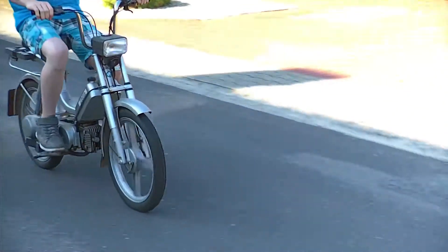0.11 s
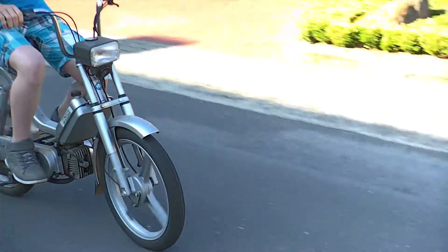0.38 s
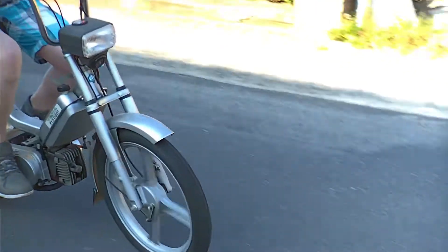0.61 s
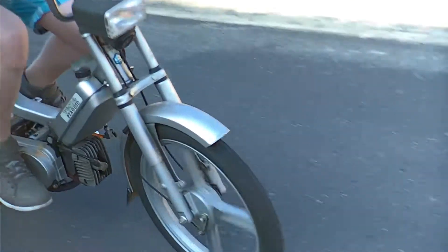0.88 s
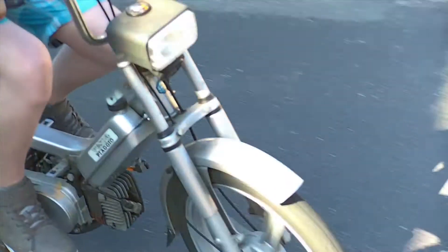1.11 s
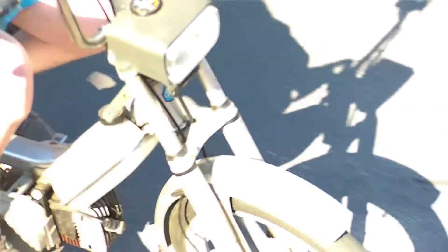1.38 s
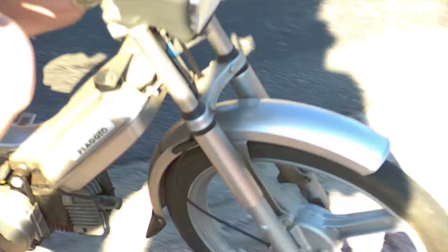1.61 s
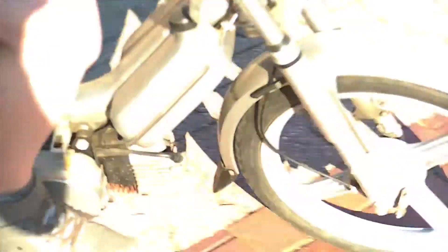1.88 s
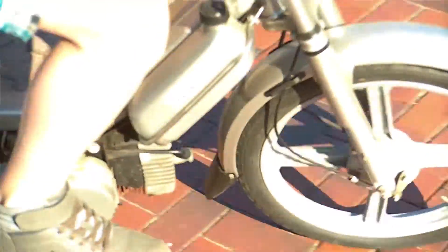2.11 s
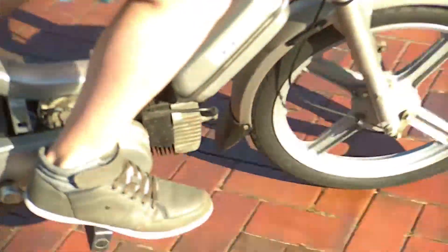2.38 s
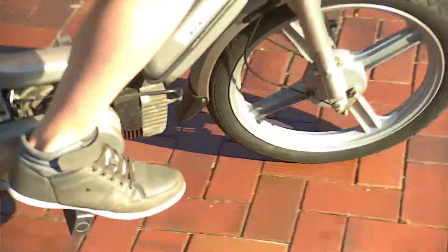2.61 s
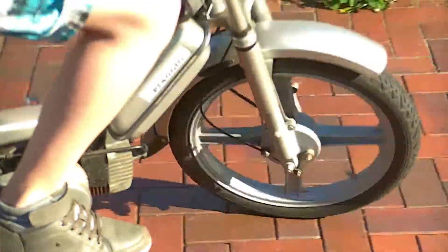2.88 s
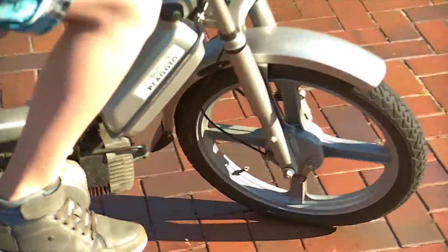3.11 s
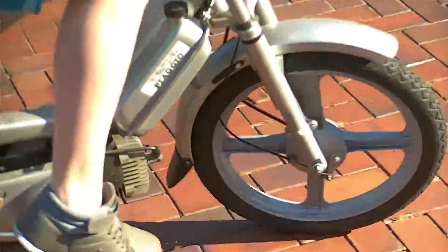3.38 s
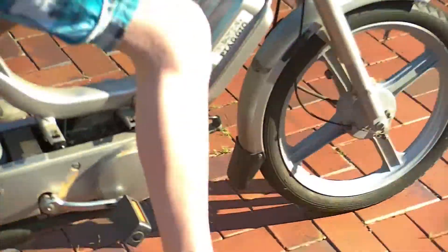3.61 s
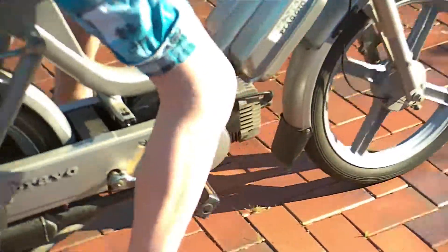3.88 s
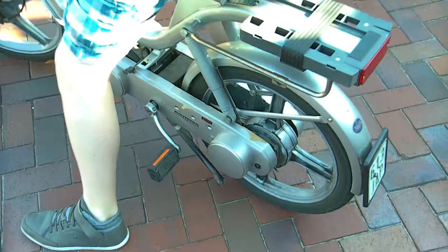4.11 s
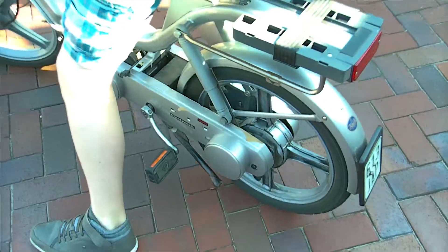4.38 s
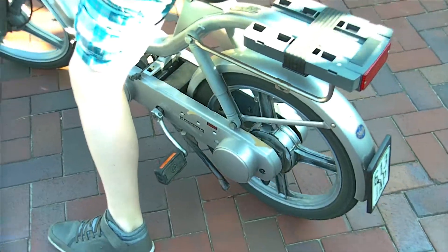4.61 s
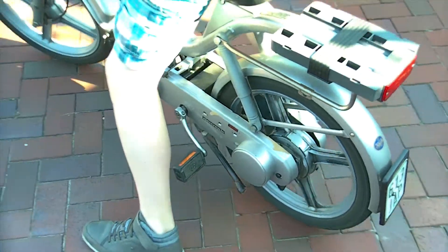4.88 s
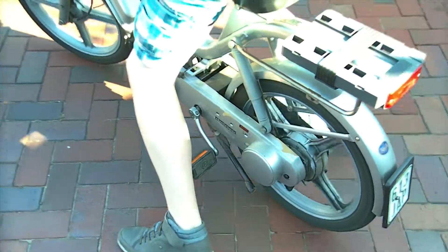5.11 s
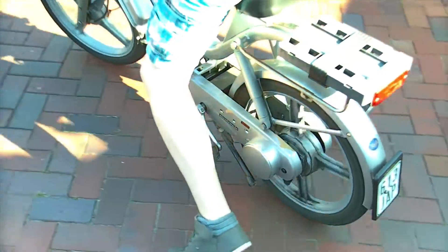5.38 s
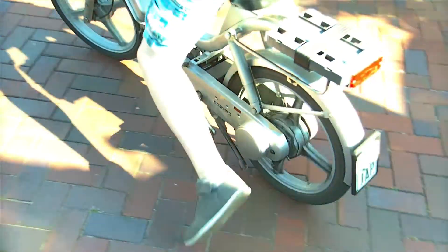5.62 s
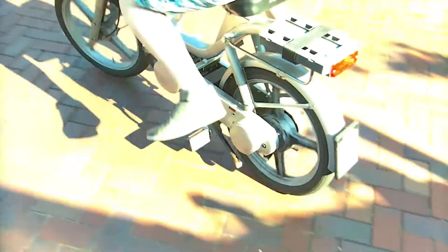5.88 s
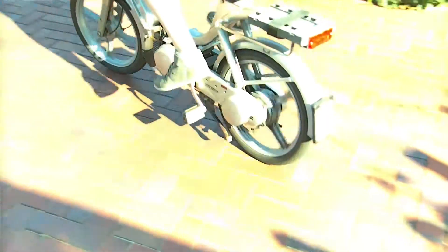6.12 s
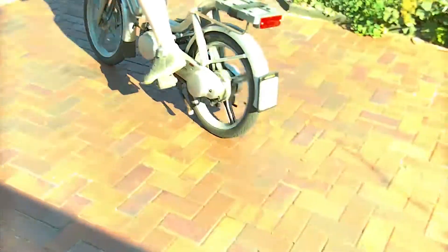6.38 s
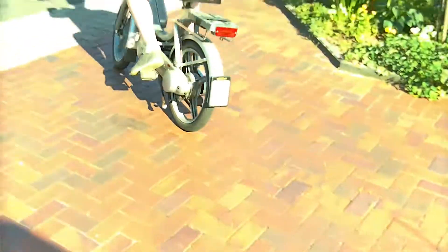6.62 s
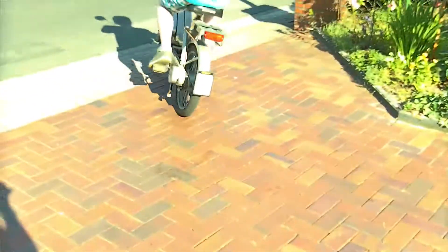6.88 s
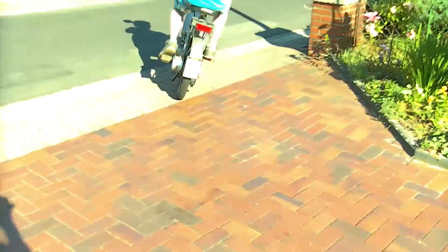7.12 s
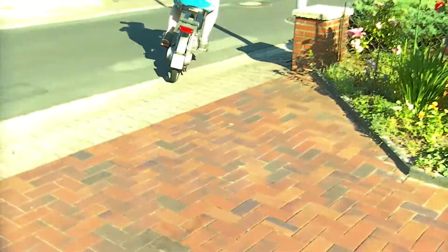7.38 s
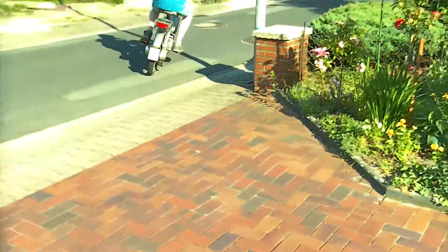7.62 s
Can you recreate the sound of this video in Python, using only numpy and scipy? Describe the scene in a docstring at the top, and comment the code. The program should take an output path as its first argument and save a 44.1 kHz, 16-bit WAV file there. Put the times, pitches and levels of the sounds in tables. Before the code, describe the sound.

A small two-stroke moped approaches on a closed throttle from 0 s, a low buzzing drone around 55 pulses a second with dry metallic clatter. Isolated pops begin early and become frequent, uneven cracks from about 1.1 s; a roar around 1 kHz swells and peaks near 1.7 s. A thin, sagging whistle near 2 kHz appears at 0.9-1.5 s and faintly at 2.1-2.5 s. The revs sink until 2.8 s, sputtering on. At 3.95 s all sound stops for a twentieth of a second. From 4.0 s it idles close by, about fourteen even cracks a second, weakening, with a hollow note. At 4.75 s the throttle opens: pitch rises, bright raspy firing on every turn, loudest around 5.6-6.2 s, tinny pings from the tailpipe. It pulls away, pitch climbing to 7.5 s, then easing and quieter by 7.7 s. Low wind puffs occur late; the loudest peaks distort.

```python
"""A small two-stroke moped rolls up on a closed throttle, with strong firings only now and then: gas
drones, the pipe buzzes, metal clatters. A thin whistle, puffs of wind and a midrange roar pass on the way.
All sound stops briefly, then it idles on an even beat of cracks with a hollow note. The throttle opens:
it fires clearly on every turn, pings from the tailpipe and pulls away, exhaust towards the microphone.
Sound comes from clicks timed by the crank, shaped noise, resonances and tones; the loudest peaks overload."""
import sys
import numpy as np
from scipy import signal
from scipy.fft import rfft, irfft, next_fast_len
from scipy.io import wavfile
from scipy.ndimage import uniform_filter1d

SR = 44100
rng = np.random.default_rng(int(sys.argv[2]) if len(sys.argv) > 2 else 0)


def generate_wav(signal):
    """Clip the signal to [-1, 1] and save it as 16-bit WAV at the path in sys.argv[1]."""
    frames = np.transpose(np.atleast_2d(signal))
    scaled = np.clip(frames, -1, 1) * 32767
    pcm = np.round(scaled).astype(np.int16)
    wavfile.write(sys.argv[1], SR, pcm)


def volts_from_decibels(level):
    """Turn decibel levels (scalar or array-like) into linear amplitude factors."""
    exponent = np.asarray(level, float) / 20
    return 10 ** exponent


N = 341775  # length in samples


def in_time(rows):
    """Columns of a table as curves over all samples."""
    s, *columns = np.transpose(rows)
    return [np.interp(np.arange(N) / SR, s, c) for c in columns]


def at_place(values, place):
    """Values given at evenly spread places, read along the ride."""
    return np.interp(place, np.linspace(0, 5, len(values)), values)


def rms_one(x):
    """Scale to rms 1."""
    return x / np.sqrt(np.mean(x ** 2) + 1e-20)


def filtered(x, order, hz, kind):
    """Butterworth filter: keeps the low, high or band part of a sound."""
    return signal.sosfilt(signal.butter(order, hz, kind, fs=SR, output="sos"), x)


def coloured(spectrum):
    """Noise of rms 1 with the given spectrum."""
    size = next_fast_len(N)
    hz, db = np.transpose(spectrum)
    bins_hz = np.arange(size // 2 + 1) * SR / size
    gain = volts_from_decibels(np.interp(np.log(bins_hz + 1), np.log(hz), db))
    return rms_one(irfft(rfft(rng.standard_normal(size)) * gain, size)[:N])


def resonate(x, hz, width_hz):
    """Two-pole resonance, gain 1 on top: a narrower one rings longer."""
    r = np.exp(-np.pi * width_hz / SR)
    feedback = [1, -2 * r * np.cos(2 * np.pi * hz / SR), r * r]
    return signal.lfilter([(1 - r * r) / 2, 0, (r * r - 1) / 2], feedback, x + 1e-18)


def dying(clicks, rise_s, fall_s):
    """Each click becomes a swell that rises fast and dies slowly."""
    up, down = np.exp(-1 / (rise_s * SR)), np.exp(-1 / (fall_s * SR))
    return signal.lfilter([1 - up], np.convolve([1, -up], [1, -down]), clicks + 1e-18)


def whole_turns(turns):
    """Samples at which the crank completes a turn."""
    return np.flatnonzero(np.diff(np.floor(turns)) > 0)


def per_turn(turns, uneven_db):
    """One click on every whole turn, with random unevenness in strength."""
    clicks, at = np.zeros(N), whole_turns(turns)
    clicks[at] = volts_from_decibels(uneven_db * rng.standard_normal(len(at)))
    return clicks


# strong firings. Columns: [t/s, relative crack level/dB, treble against the crack, level/dB]
FIRINGS = [(0.0985, -9, -12), (0.2248, -7, -14), (0.4802, -4.5, -14), (0.5351, -2.5, -17.5),
           (0.6989, -9, -14), (0.754, -4, -13), (0.8612, -11, -18), (1.1018, -7, -19), (1.1563, 1, -20),
           (1.2303, -4, -31), (1.285, -3, -14), (1.3434, 4.5, -19), (1.3982, -4, -19), (1.4545, 2, -14),
           (1.493, -7, -19), (1.6069, -2, -13), (1.6641, 1, -22), (1.724, -2.5, -12), (1.7816, -4, -18),
           (1.8367, 7, -20), (1.9165, -7, -9), (1.9985, -2.5, -7), (2.0393, -10, -5), (2.2111, -5, -14),
           (2.2578, -8, -13), (2.3234, -5, -7), (2.367, -4, -12), (2.4577, -14.5, 3), (2.5045, -1.5, -16),
           (2.593, 2, -28), (2.6609, -11, 0.5), (2.7288, -7.5, -8), (2.7751, -7, -9), (2.822, -14, 1),
           (3.004, -5.5, -11), (3.05, -2.5, -13), (3.0966, -4, -8), (3.142, -5, -7), (3.2809, -20, 9),
           (3.3269, -3.5, -10), (3.3719, -2.5, -14), (3.4431, -13, -4), (3.5113, -20, 7), (3.7877, -16, -1),
           (3.8332, -5.5, -8), (3.8777, -6, -7), (4.6638, 3.5, -10.5), (4.8925, -7, -6), (5.0315, -2, -12),
           (5.2069, 1.5, -13), (5.245, 0, -9), (5.3397, -1, -16), (5.5022, -3, -5), (5.7209, -1, -3),
           (5.8531, 1, -3), (6.0947, -5, -6), (6.3735, 1, -6), (6.4707, -6, 1), (6.7783, -4, -7),
           (7.0847, -7, -6), (7.3192, 0, -23), (7.7303, -2, -25)]
# standing at idle it fires on every third turn, the beats slowly weakening
IDLE_S, IDLE_BEAT_S = (4.0272, 4.81), 0.0708
IDLE_CRACK_DB, IDLE_FADE_DB_PER_S, IDLE_TREBLE_DB = -2.5, 8.5, -10.5


def strong_firings():
    """The listed firings and the even beat of the idle, in time order."""
    s = np.arange(*IDLE_S, IDLE_BEAT_S)
    # a listed firing replaces the beat next to it
    s = s[np.abs(s[:, None] - np.array(FIRINGS)[:, 0]).min(axis=1) > IDLE_BEAT_S / 2]
    crack_db = IDLE_CRACK_DB - IDLE_FADE_DB_PER_S * (s - IDLE_S[0])
    beat = np.transpose([s, crack_db, np.full(len(s), IDLE_TREBLE_DB)])
    rows = np.vstack([FIRINGS, beat])
    return rows[np.argsort(rows[:, 0])].T


# basic crank speed, before it is nudged towards the firings. Columns: [t/s, speed/(turns/s)]
SPEED = [(0, 55.6), (1, 54.4), (1.3, 53.5), (1.8, 51.9), (2, 47.8), (2.35, 44.8), (2.75, 43.6),
         (3.95, 43.5), (4, 42.4), (4.78, 42.4), (4.95, 50.6), (5.25, 52), (5.65, 60.2), (6, 61.6),
         (6.75, 61.7), (7.02, 67), (7.58, 70.1), (7.75, 59.5)]


def crank():
    """Crank angle in turns, gently shifted so that strong firings fall close to whole turns."""
    speed, = in_time(SPEED)
    turns = np.cumsum(speed) / SR
    at = (strong_firings()[0] * SR).astype(int)
    slip = np.unwrap(2 * np.pi * turns[at]) / (2 * np.pi)
    return turns - uniform_filter1d(np.interp(np.arange(N), at, slip), SR // 3)


# strength of each multiple of the crank speed, one table per place along the ride
# Columns: [multiple of the crank speed, relative level/dB]
ORDERS_COMING = [(1, -35), (2, -6), (3, -4), (4, 5), (5, 0.5), (6, -9.5), (7, -20), (8, 1.5), (9, -10.5),
                 (10, 0.5), (11, -21), (12, 9.5), (13, -23), (14, 4), (15, -11), (16, -6), (17, -46),
                 (18, -35), (19, 4), (20, -32), (21, -18)]
ORDERS_ALONGSIDE = [(1, -24), (2, -29), (3, -8), (4, -8.5), (5, -3.5), (6, 3.5), (7, -10), (8, -8.5),
                    (9, -10), (10, -9), (11, -10.5), (12, -7), (13, 3.5), (14, -10), (15, -12), (16, 0.5),
                    (17, -4), (18, -2), (19, -12), (20, -3), (21, -12.5)]
ORDERS_TURNING = [(1, -26), (2, -6.5), (3, -12), (4, -2.5), (5, 4.5), (6, -4), (7, -6), (8, -6), (9, -4),
                  (10, -10), (11, 2), (12, 4), (13, -20), (14, -9), (15, -18), (16, -14), (17, -18),
                  (18, -18), (19, -18), (20, -18), (21, -18)]
ORDERS_BEHIND = [(1, -34), (2, -14), (3, -20), (4, -10), (5, -6), (6, -10.5), (7, -6.5), (8, -28),
                 (9, -9.5), (10, -9), (11, -8.5), (12, -30), (13, -19), (14, -11), (15, -22), (16, -22),
                 (17, -22), (18, -24), (19, -14), (20, -24), (21, -24)]
ORDERS_LEAVING = [(1, -23), (2, -10), (3, -8.5), (4, -10), (5, -0.5), (6, -12.5), (7, -16.5), (8, -25),
                  (9, -10), (10, -17), (11, -7), (12, -23), (13, -10), (14, -10), (15, -12), (16, -1),
                  (17, 2), (18, -1), (19, -4), (20, -20), (21, -16)]
ORDERS_FAR = [(1, -10), (2, -0.5), (3, 2.5), (4, 4.5), (5, -5.5), (6, -2), (7, -5), (8, -19), (9, 0),
              (10, -15), (11, -6), (12, 3), (13, -21), (14, -8), (15, -14), (16, 6.5), (17, -17), (18, -18),
              (19, -21), (20, 2), (21, -11)]
# drone against the engine loudness. Columns: [level/dB at each of the six places]
DRONE_DB = [-13.5, -11, -10.5, -7, -10.5, -11]


def drone(turns, place, level_db, spread=.45):
    """Gas pumped once a turn: clean multiples of the crank speed, the higher ones arriving later."""
    tables = np.array([ORDERS_COMING, ORDERS_ALONGSIDE, ORDERS_TURNING,
                       ORDERS_BEHIND, ORDERS_LEAVING, ORDERS_FAR])[:, :, 1]
    # each place has rms 1 before the wobble
    tables = tables - 10 * np.log10(np.sum(volts_from_decibels(tables) ** 2, axis=1, keepdims=True) / 2)
    out, slow = np.zeros(N), np.arange(N) / 3000  # a new wobble value every 3000 samples
    wobble = rng.standard_normal((tables.shape[1], int(slow[-1]) + 2))
    for k, (db, w) in enumerate(zip(tables.T, wobble), 1):
        order_db = at_place(db, place) + 2.0 * np.interp(slow, np.arange(len(w)), w)
        out += volts_from_decibels(order_db) * np.cos(2 * np.pi * k * (turns - .15) - spread * k * k)
    return volts_from_decibels(level_db + at_place(DRONE_DB, place)) * out


def rumble(place, level_db):
    """Deep soft noise that follows the level of the drone."""
    low = rms_one(filtered(rng.standard_normal(N), 2, [18, 70], "band"))
    return volts_from_decibels(level_db + at_place(DRONE_DB, place) - 35.0) * low


# colour of the clatter: throttle shut, near, far. Columns: [f/Hz, relative level/dB per Hz]
CLATTER_SHUT = [(240, -15), (400, -8), (666, 0.5), (1160, -2.5), (1840, 4), (2180, -2.5), (3810, 0.5),
                (7500, -9.5), (10200, -8), (14800, -10), (16000, -45)]
CLATTER_NEAR = [(240, -74), (400, -11.5), (1140, 2), (1420, 1.5), (3210, 2), (3690, 2.5), (4310, -1.5),
                (11800, -11.5), (15000, -7), (16000, -35)]
CLATTER_FAR = [(240, -43), (400, -2.5), (1110, 11), (3260, 4), (3690, 14), (4380, 1.5), (8110, 2.5),
               (11800, -11), (14600, 6), (16000, -29)]
# clatter against the engine loudness. Columns: [level/dB at each of the six places]
CLATTER_DB = [0.12, 0.1, 0.1, 0.078, 0.064, 0.085]


def clatter(turns, place, level_db):
    """Piston, chain, intake and tyres: noise swelling mainly twice a turn; raw, and at the engine level."""
    noise = np.zeros(N)
    for share, colour in (([1, 1, .3, 0, 0, 0], CLATTER_SHUT),
                          ([0, 0, .7, 1, 1, 0], CLATTER_NEAR),
                          ([0, 0, 0, 0, 0, 1], CLATTER_FAR)):
        noise += np.sqrt(at_place(share, place)) * coloured(colour)
    once, twice = np.cos(2 * np.pi * (turns - .2)), np.cos(4 * np.pi * (turns - .1))
    noise = noise * volts_from_decibels(0.37 * once + 0.88 * twice)
    return noise, volts_from_decibels(level_db + at_place(CLATTER_DB, place)) * noise


# notes of the exhaust pipe. Columns: [f/Hz, basic width/Hz, relative level/dB at each of the six places]
PIPE = [(632, 140, -13, -25, -9, -16, -22, -9), (1036, 100, -20, -4, -7, -46, -4.5, -32),
        (1143, 117, -36, -26, -3, -0.5, -8.5, -27), (1430, 36, -25, -15, -13, 6, -45, -24),
        (1710, 140, -19, -15.5, -8, -35, -5, -37), (1920, 54, -4.5, -5, -24, -2, -12.5, -12.5),
        (2160, 62, -18.5, -26, -6, -16, -16, -13), (2342, 58, -10.5, -7, -5, -13, -4.5, -13)]
# clatter running along in the pipe. Columns: [level/dB at each of the six places]
PIPE_CLATTER_DB = [-8, -8, -12, -16, -16, -12]
# buzz against the engine loudness. Columns: [level/dB at each of the six places]
BUZZ_DB = [-8.5, -14.5, -6.5, -7.5, -9.5, -8]


def buzz(turns, noise, place, level_db):
    """Steady pulses ring the pipe, so its resonances hold combs of clean lines; some clatter runs along."""
    pulses, out = rms_one(per_turn(turns - .3, uneven_db=1.0)), np.zeros(N)
    drive = pulses + volts_from_decibels(at_place(PIPE_CLATTER_DB, place)) * noise
    for k, (hz, width_hz, *db) in enumerate(PIPE):
        rung = resonate(resonate(drive, hz, 2.54 * width_hz), hz, width_hz)
        out += (-1) ** k * volts_from_decibels(at_place(db, place)) * rms_one(rung)
    return volts_from_decibels(level_db + at_place(BUZZ_DB, place)) * out


# notes of loose metal. Columns: [f/Hz, basic width/Hz, level/dB against the engine loudness]
TICK_MODES = [(3850, 140, -17), (4330, 120, -18)]


def chatter(turns):
    """Loose metal is knocked twice a turn, unevenly, and rings briefly."""
    out = np.zeros(N)
    for hz, width_hz, db in TICK_MODES:
        knocks = per_turn(2 * turns, uneven_db=4)
        out += volts_from_decibels(db) * rms_one(resonate(resonate(knocks, hz, width_hz), hz, 2.5 * width_hz))
    return out


def street():
    """A faint low murmur of the street: steady band-limited noise."""
    return volts_from_decibels(-44.0) * rms_one(filtered(rng.standard_normal(N), 3, [130, 500], "band"))


# ordinary cracks against the engine loudness. Columns: [level/dB at each of the six places]
TURN_CRACK_DB = [-0.5, 1, 11, 3.5, 4, 4.5]
# low push of a strong firing, likewise. Columns: [level/dB at each of the six places]
THUMP_DB = [-16.5, -7.5, -3, -43, -33, -40]
IDLE_QUIET_DB = -29  # ordinary turns stay quiet at idle
CRACK_LAG_DB, CRACK_LAG_S = -7.5, 0.66  # the cracks grow to full size only after the revs have come up


def firings(turns, place, level_db, throttle, idling, rolling):
    """Clicks of all firings: the strong ones, and a weaker uneven one on each turn between them."""
    s, peak_db, treble_db = strong_firings()
    strong = (s * SR).astype(int)
    at = whole_turns(turns)
    since_opening = np.arange(N) / SR - THROTTLE_OPENS_S
    lag = np.clip(1 - since_opening / CRACK_LAG_S, 0, 1) * ~rolling
    crack_db = level_db + at_place(TURN_CRACK_DB, place) + IDLE_QUIET_DB * idling + CRACK_LAG_DB * lag
    thump_db = level_db + at_place(THUMP_DB, place)
    uneven_db = 4.6 - 2.86 * throttle[at]  # open throttle fires louder and more evenly
    size_db = crack_db[at] + 5.0 * throttle[at] + uneven_db * rng.standard_normal(len(at))
    free = np.abs(at[:, None] - strong).min(axis=1) > SR * .007  # turns with no strong firing within 7 ms
    crack, thump, treble = np.zeros((3, N))
    crack[at[free]] = volts_from_decibels(size_db[free])
    treble[at[free]] = volts_from_decibels(size_db[free] - 8.0)
    crack[strong] = volts_from_decibels(peak_db)
    treble[strong] = volts_from_decibels(peak_db + treble_db)
    # the push follows the crack only a little
    thump[strong] = volts_from_decibels(thump_db[strong] + 0.26 * (peak_db - peak_db.mean()))
    return crack, thump, treble


# colour of the noise in a crack. Columns: [f/Hz, relative level/dB per Hz]
CRACK = [(300, -11), (1000, 0.5), (2500, -1.5), (4000, 9.5), (7000, 0.5), (10000, 7), (15000, -2.5),
         (17000, -51)]


def cracks(crack, treble):
    """Each firing spits a short burst of bright noise with a weaker tail."""
    def burst(clicks):
        return dying(clicks, 0.0011, 0.0022) + volts_from_decibels(-12.0) * dying(clicks, 0.005, 0.0073)
    noise = coloured(CRACK)
    low, high = filtered(noise, 4, 8000, "low"), filtered(noise, 4, 8000, "high")
    return volts_from_decibels(-9.0) * burst(crack) * low + volts_from_decibels(3.0) * burst(treble) * high


# notes of the silencer. Columns: [f/Hz, basic width/Hz, gain level/dB, delay t/s]
SILENCER = [(184, 114, 43, 0.0015), (280, 123, 42, 0.0028), (380, 78, 34.5, 0.00601),
            (523, 114, 39.5, 0.00881)]


def thumps(clicks):
    """A strong firing pushes a low pulse through the silencer; its upper part arrives a few ms later."""
    push = filtered(clicks, 4, 140, "high")
    out = np.zeros(N)
    for hz, width_hz, db, late_s in SILENCER:
        rung = resonate(resonate(push, hz, 2.0 * width_hz), hz, width_hz)
        out += volts_from_decibels(db) * np.roll(rung, int(late_s * SR))
    return out


def gas_rush(thump, noise):
    """A broad rush of gas goes with each low push: the clatter noise, opened for a few ms."""
    return volts_from_decibels(6) * dying(thump, rise_s=0.0034, fall_s=0.0049) * noise


# notes of casing and fins. Columns: [f/Hz, basic width/Hz, relative level/dB at each of the six places]
BODY = [(2842, 160, -8.5, -26.5, -14, -21, -11, -10), (3815, 54, -11, -7, -9, -24, -14, -24),
        (4320, 57, -19, -15, -29, -51, -51, -56), (4695, 46, -13, -8, -19, -10, -10, -15),
        (5170, 440, -5, -8.5, 2, -1, -4, -2), (5610, 81, -4, -6.5, -4, -19, -13, -14),
        (5970, 175, -7, -4.5, -20, -17, -4.5, -13), (6517, 59, -4, -10, -4, -5.5, -6, -10),
        (6927, 197, -1, -18, 4.5, -2.5, 0, -8), (7505, 79, -1, -9, -10, -10, -5.5, -6.5),
        (8350, 360, -2, -28, -11, -15, -3.5, -14), (9340, 245, -23, -25, -5, 2, 1, -17),
        (9790, 510, -6, -15, -25, -37, -4, -25), (12230, 190, -6, -6, -20, -3, -7, -14),
        (11760, 900, -17, -12.5, -15, -6, -3, 1), (13600, 570, -4, 6, -7, -9, -30, -7)]
BLOW_DB, BLOW_SPREAD_DB = -14.5, 3  # how hard and how unevenly a firing strikes the casing


def body(clicks, drive, place):
    """Firings strike the casing, each mode with a new strength, sign and moment; noise rings it too."""
    out, at = np.zeros(N), np.flatnonzero(clicks)
    luck = rng.standard_normal((len(at), len(BODY)))
    sign, late = rng.choice([-1, 1], luck.shape), rng.random(luck.shape)
    for k, (hz, width_hz, *db) in enumerate(BODY):
        blows = np.zeros(N)
        when = np.minimum(at + (late[:, k] * .004 * SR).astype(int), N - 1)  # up to 4 ms late
        strength = sign[:, k] * volts_from_decibels(BLOW_SPREAD_DB * np.clip(luck[:, k], -2, 1.5))
        blows[when] = clicks[at] * strength * SR / (np.pi * width_hz)
        struck = resonate(resonate(blows, hz, 3 * width_hz), hz, 1.5 * width_hz)
        rung = volts_from_decibels(BLOW_DB) * struck + resonate(drive * np.sqrt(300 / width_hz), hz, width_hz)
        out += (-1) ** k * volts_from_decibels(at_place(db, place)) * rung
    return filtered(out, 3, 900, "high")


# a whistle that comes and goes while rolling. Columns: [start t/s, length t/s, starting f/Hz, basic level/dB]
WHISTLE = [(.88, .64, 1995, -24.5), (2.08, .46, 1935, -30)]


def whistle():
    """A wavering narrow tone that swells, sags in pitch and dies."""
    t, out = np.arange(N) / SR, np.zeros(N)
    waver = rms_one(dying(rng.standard_normal(N), 0.0048, 0.0096))
    for s, length, hz, db in WHISTLE:
        age = np.clip(t - s, 0, length)
        swell = np.sin(np.pi * age / length) ** 1.2
        out += volts_from_decibels(db) * swell * np.sin(2 * np.pi * (hz - 150 * age / 2) * age)  # pitch sags 150 Hz per s
    return out * (1 + 0.21 * waver)


# wind on the microphone. Columns: [middle t/s, level/dB at the middle, spread t/s to each side, top f/Hz]
PUFFS = [(1.054, -52, .03, 90), (5.9, -81, 0.029, 120), (6.115, -44, 0.018, 150), (6.31, -48, 0.043, 120),
         (7.233, -39, 0.036, 230), (7.403, -54, 0.044, 253), (7.448, -32, 0.054, 280),
         (7.73, -39, 0.054, 200)]


def wind():
    """Puffs of wind on the microphone: short lumps of low noise."""
    out, t = np.zeros(N), np.arange(N) / SR
    noise = rng.standard_normal(N)
    for s, db, length, hz in PUFFS:
        low = rms_one(filtered(noise, 3, [25, hz], "band"))
        out += volts_from_decibels(db) * low * np.exp(-((t - s) / length) ** 2)
    return out


def roar(noise, level_db, hz=995, width_hz=270):
    """A midrange roar that swells as it draws near: clatter noise through two resonances."""
    near = np.exp(-((np.arange(N) / SR - 1.67) / 0.52) ** 2)  # strongest at 1.67 s
    rung = resonate(resonate(noise, hz, width_hz), hz, 2 * width_hz)
    return near * volts_from_decibels(level_db - 14.5) * rms_one(rung)


def hollow_note(noise, level_db, hz=1130, width_hz=60):
    """Hollow note of the idle: clatter noise through two narrow resonances."""
    rung = resonate(resonate(noise, hz, width_hz), hz, 2 * width_hz)
    return volts_from_decibels(level_db - 16) * rms_one(rung)


THROTTLE_OPENS_S, OPENING_S, THROTTLE_EASES_S, EASING_S = 4.75, 0.087, 7.355, 0.57


def throttle_opening():
    """How far the throttle is open, 0 to 1: opens quickly, eases off near the end."""
    t = np.arange(N) / SR
    opening = (t - THROTTLE_OPENS_S) / OPENING_S
    easing = 1 - (t - THROTTLE_EASES_S) / EASING_S
    return np.clip(np.minimum(opening, easing), 0, 1)


def ping(turns, hz, width_hz):
    """Each turn sends a rounded ping of a few ms through three equal resonances."""
    out = per_turn(turns, uneven_db=2.2)
    for _ in range(3):
        out = resonate(out, hz, width_hz)
    return rms_one(out)


# tailpipe heard from behind, at full throttle
# Columns: [t/s, ping level/dB, very high ping level/dB, ping near 5.5 kHz level/dB]
PINGS = [(4.8, -35, -52, -32), (4.95, -32, -51, -24), (5.15, -40, -41, -39.5), (5.35, -27.5, -35, -18),
         (5.5, -22, -30, -27), (5.92, -15, -36, -21), (6.35, -12.5, -29, -28), (6.7, -28.5, -29, -28),
         (6.96, -16.5, -25.5, -43), (7.2, -25, -26, -40), (7.35, -19.5, -19.5, -31), (7.45, -36, -28, -29),
         (7.6, -16.5, -22, -25), (7.75, -34, -12, -30)]


def tailpipe_pings(turns, throttle):
    """Under throttle each firing leaves the tailpipe as pings at three pitches."""
    ping_db, high_ping_db, mid_ping_db = in_time(PINGS)
    out = volts_from_decibels(ping_db) * ping(turns, hz=3710, width_hz=400)
    out += volts_from_decibels(high_ping_db) * ping(turns, hz=11990, width_hz=750)
    out += volts_from_decibels(mid_ping_db) * ping(turns, hz=5600, width_hz=630)
    return throttle * out


# basic engine loudness between cracks, before and after the silence. Columns: [t/s, level/dB]
ENGINE = [
    [(0.0, -24), (0.44, -23.5), (1.02, -19.5), (1.68, -17), (2.75, -20), (3.62, -20), (3.93, -22)],
    [(4.05, -17.5), (4.19, -18), (4.67, -19.5), (4.95, -15), (5.62, -10), (5.91, -10), (6.21, -10),
     (7.75, -18)],
]
# Columns: [t/s, place: 0 coming, 1 alongside, 2 turning away, 3 close behind, 4 leaving, 5 far]
RIDE = [(.9, 0), (2.2, 1), (3.95, 1.68), (4.0, 1.5), (4.75, 1.6), (4.9, 3), (5.4, 3.5), (5.8, 3.5),
        (6.3, 4), (6.6, 4), (7.2, 5)]
SILENCE_S, FADE_IN_S = (3.949, 4.008), 0.008


def scene():
    """Engine, street and wind, with the short silence."""
    t = np.arange(N) / SR
    (level_db,), (place,) = in_time(ENGINE[0] + ENGINE[1]), in_time(RIDE)
    throttle = throttle_opening()
    rolling = t < SILENCE_S[0]
    idling = (t > SILENCE_S[0]) * (1 - throttle) * (t < THROTTLE_EASES_S)
    turns = crank()
    crack, thump, treble = firings(turns, place, level_db, throttle, idling, rolling)
    noise, rattle = clatter(turns, place, level_db)
    spit = cracks(crack, treble)
    casing_drive = volts_from_decibels(-4 + 3 * throttle) * rattle + volts_from_decibels(4) * spit
    engine = drone(turns, place, level_db) + buzz(turns, noise, place, level_db)
    engine += volts_from_decibels(-4.5) * rattle + rolling * volts_from_decibels(level_db) * chatter(turns)
    engine += spit + thumps(thump) + gas_rush(thump, noise) + body(crack, casing_drive, place)
    engine += whistle() + roar(noise, level_db)
    engine += idling * hollow_note(noise, level_db) + tailpipe_pings(turns, throttle)
    engine = filtered(engine, 3, 55, "high")
    heard = np.where(rolling, 1, np.clip((t - SILENCE_S[1]) / FADE_IN_S, 0, 1))
    return ((engine + rumble(place, level_db) + street() + wind()) * heard)[None]


def top_cut(x):
    """Nothing passes above the cut-off."""
    return signal.sosfilt(signal.butter(12, 16410, fs=SR, output="sos"), x)


def record(dry):
    """A narrow dip near 8 kHz, then the microphone overloads: peaks are cut off flat."""
    dipped = dry - .85 * resonate(dry, 7950, 120)
    mix = np.clip(dipped, -1, 1)
    return top_cut(mix)


dry = scene()
out = record(dry)
generate_wav(out)
```